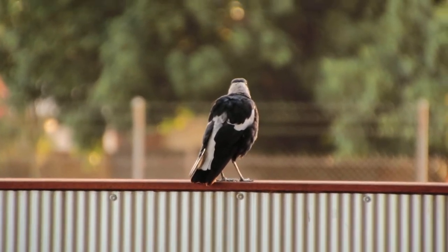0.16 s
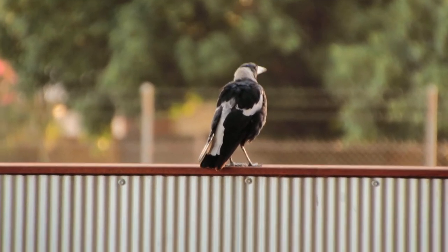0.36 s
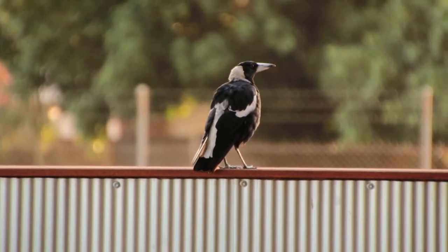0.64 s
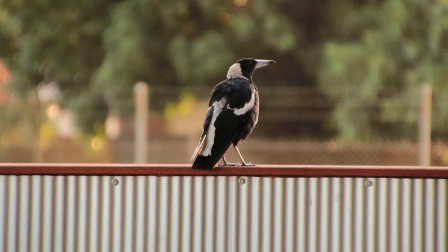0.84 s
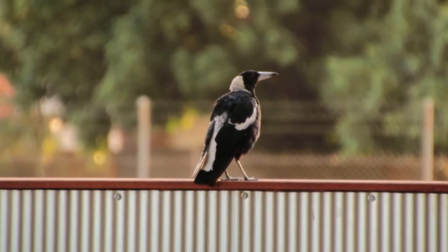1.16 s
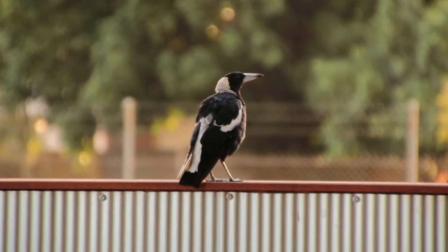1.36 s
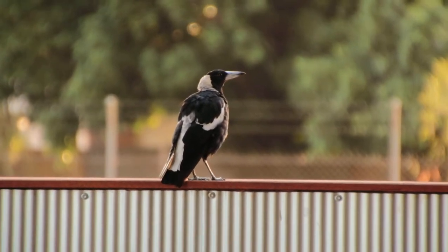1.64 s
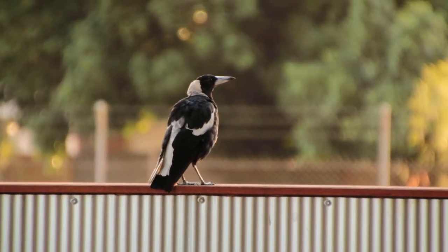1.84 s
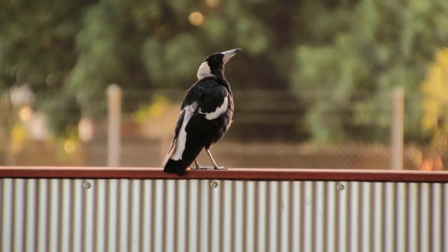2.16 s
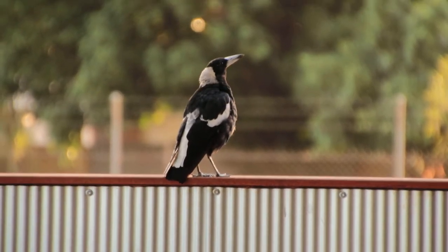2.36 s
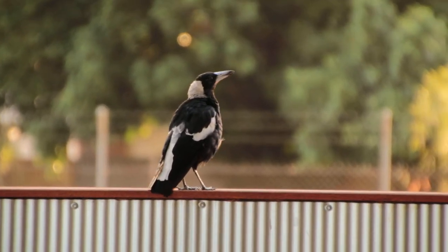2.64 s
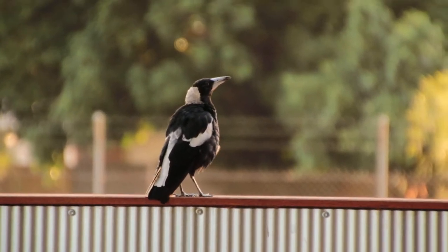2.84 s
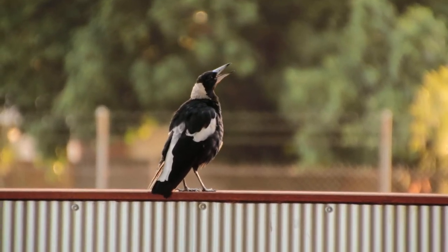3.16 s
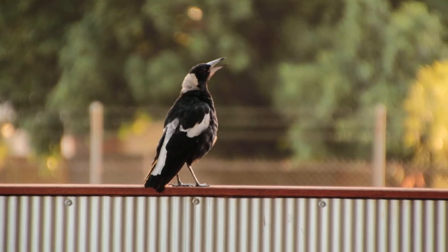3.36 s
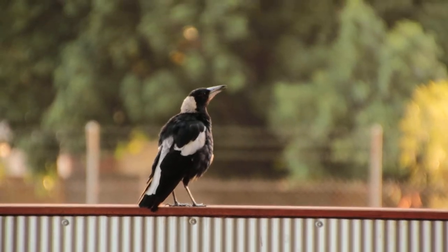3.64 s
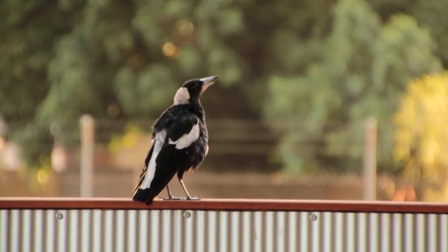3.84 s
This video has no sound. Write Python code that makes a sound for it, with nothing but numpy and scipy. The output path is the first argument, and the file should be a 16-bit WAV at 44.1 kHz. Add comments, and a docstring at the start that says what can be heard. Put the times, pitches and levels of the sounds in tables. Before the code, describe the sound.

Distant traffic hum and thin twittering of small birds come first; then a nearby magpie gives low broken warbles, a clear flute note, and a loud gliding carol, picked up in stereo in an open yard.

```python
"""Low traffic rumble and a far twittering flock are heard first, with small birds chirping in the distance.
A magpie on a garden fence then warbles softly and breaks into a loud carol.
The two sides of its syrinx sing near-pure tones, amplitude-modulated into flutter, beating and raspy.
Rasp is noise pulsed by the voice; decaying noise tails supply the reflections of fence and yard.
Traffic is filtered noise with wavering engine drones."""
import sys
import numpy as np
from scipy import signal
from scipy.fft import rfft, irfft
from scipy.io import wavfile
from scipy.ndimage import uniform_filter1d

SR = 44100
rng = np.random.default_rng(int(sys.argv[2]) if len(sys.argv) > 2 else 0)


def digitize_waveform(pressure):
    """Quantize a signal to 16-bit integers and store it at the path in sys.argv[1].

    Rows of a 2-D input are taken as channels; values are limited to [-1, 1].
    """
    field = np.atleast_2d(pressure).T
    bounded = np.clip(field, -1, 1)
    quanta = np.round(bounded * 32767).astype(np.int16)
    wavfile.write(sys.argv[1], SR, quanta)


N = 176400
T = np.arange(N) / SR

# Levels in the tables are relative: the gains and trims named below act on them too.
# soft warbled notes:
# [t/s, length/s, start f/Hz, end f/Hz, level/dB, flutter f/Hz, flutter depth/1, roughness/1]
WARBLES = [(2.17, 0.029, 655, 700, -42, 119, 0.03, .3), (2.192, 0.12, 1335, 1278, -40.5, 196, 0.34, 0.34),
           (2.213, 0.037, 1430, 1610, -39.5, 110, 0.2, .7),
           (2.235, 0.074, 1062, 1168, -38.5, 88.6, 0.47, 0.36), (2.268, 0.062, 957, 975, -34, 89, .2, 0.26),
           (2.31, 0.054, 1020, 986, -29, 171, .5, 0.15), (2.482, 0.076, 639.3, 635, -29.5, 132, 0, 0),
           (2.484, 0.071, 779, 765, -30.5, 195, 0, 0.27),
           (2.56, 0.075, 743.5, 784, -37.5, 125.3, 0.8, 0.65),
           (2.588, .035, 610, 640, -41.5, 140, 0.2, 0.03), (2.632, 0.072, 930, 970, -34, 52, 0.4, 0.52),
           (2.768, 0.049, 667, 760, -39, 100, .5, 0.35),
           (2.788, 0.089, 1357, 1397, -33.5, 302.6, 0.4, 0.37),
           (2.795, 0.11, 985, 1108, -37.5, 95, 0.65, 0.65), (2.815, 0.039, 1580, 1620, -36.5, 110, 0.6, .7),
           (2.874, 0.039, 786, 770, -33, 100, 0.04, 0), (2.93, 0.097, 776, 800, -41.5, 99, 0, 0.03),
           (3.018, 0.034, 973, 970, -29.5, 66, .6, .05), (3.047, 0.081, 975, 994, -23, 62, 0.72, 0.02),
           (3.04, 0.12, 923.5, 909, -28, 65.4, 0.42, 0.2), (3.11, 0.044, 667, 599, -37, 127, 0.15, 0),
           (3.115, 0.063, 808, 748, -33, 131.4, 0.5, 0.37), (3.145, 0.066, 988, 976, -29, 68, 0.3, 0.2),
           (3.21, 0.043, 908, 710, -35.5, 216.4, 1.1, 0.7)]
# loud short tones: cries, an overtone of the glide, and the long note's rough end:
# [t/s, length/s, start f/Hz, end f/Hz, level/dB, flutter f/Hz, flutter depth/1, roughness/1]
LOUD_TONES = [(3.208, 0.068, 1547, 1532, -31.5, 191, 0.9, 0.73),
              (3.265, 0.1, 1880, 2026, -34, 324, 1, 0.54), (3.27, 0.13, 3050, 3052, -33, 468, 0.58, .2),
              (3.333, 0.062, 2047, 2019, -22, 230, .2, 0.27),
              (3.455, 0.057, 1790, 1757, -30, 168, 0.37, 0.36),
              (3.525, 0.099, 1543, 1584, -26, 181, .4, 0.53), (3.835, 0.075, 838, 826, -29, 117, .3, 0.12),
              (3.865, 0.048, 1645, 1542, -32.5, 111, 0.34, 0.91),
              (3.9, 0.046, 1533, 1445, -24, 108.6, 0.44, 0.31),
              (3.908, 0.09, 1000, 951, -20, 109.5, 0.68, 0.11),
              (3.942, 0.048, 1278, 1355, -20, 104, 0.27, 0.67),
              (3.975, 0.029, 1290, 1230, -20, 71.8, .4, 0.36)]
# a note sung mostly on its octave: [t/s, f/Hz, level/dB]
SQUEAL = [(3.176, 980, -45), (3.192, 969, -27), (3.22, 936, -27), (3.243, 957, -23.5), (3.268, 977, -27)]
# pure fluted notes, a short and a long one: [t/s, f/Hz, level/dB]
SHORT_FLUTE = [(2.338, 975, -25.5), (2.36, 988, -14.5), (2.418, 956.4, -24.5), (2.46, 971, -30)]
LONG_FLUTE = [(3.535, 964, -40), (3.545, 978, -27), (3.585, 983, -16), (3.673, 911.7, -15.5),
              (3.705, 919.2, -23.5), (3.719, 901.3, -12.5), (3.799, 896.6, -22), (3.817, 884.6, -12.5),
              (3.901, 888.0, -25.5), (3.93, 883, -11)]
# flutter of the long note: [t/s, mean f/Hz, depth/1]
THROB = [(3.54, 144, 0), (3.62, 156, 0.13), (3.72, 173, 0.27), (3.8, 170.2, 0), (3.87, 140.3, 0.41),
         (3.93, 137.5, 0.55)]
# the two sides of the syrinx gliding down together: [t/s, f/Hz, level/dB]
LOW_SIDE = [(3.27, 1546, -44), (3.325, 1513, -29), (3.385, 1465, -29.5), (3.412, 1430, -18.5),
            (3.455, 1365, -33), (3.475, 1407, -16.5), (3.505, 1364, -23), (3.525, 1370, -20)]
HIGH_SIDE = [(3.35, 1737, -32), (3.379, 1685, -17), (3.413, 1671, -21), (3.429, 1600, -15),
             (3.466, 1589, -22.5), (3.497, 1508, -19), (3.53, 1539, -24.5)]
# overtones from the second harmonic up, relative to the fundamental: [level/dB]
SOFT_OVERTONES = [-23.5, -34]
LOUD_OVERTONES = [-26.5, -26, -49]
SQUEAL_OVERTONES = [15.5, -2.5, -2, -8, -2, -26, -32]
FLUTE_OVERTONES = [-34.5, -34, -42.5, -37, -39.5, -50.5, -39.5]
# frayed overtones of the glide, from the second harmonic up: [level/dB]
FRAYED_OVERTONES = [-21.5, -15.5, -21.5, -26.5, -36]
# rasp of the loud phrase over time: [t/s, level/dB]
RASP_LEVEL = [(3.18, -63), (3.21, -51), (3.3, -48), (3.345, -34), (3.38, -32), (3.48, -40.5), (3.54, -38.5),
              (3.6, -53.5), (3.85, -50), (3.91, -35), (4, -44)]
# spectrum of the rasp: [f/Hz, level/dB]
RASP_COLOUR = [(1100, -22), (1600, -16.5), (2500, -14), (3300, 16.5), (4000, 6.5), (4600, -9), (5900, 11),
               (6700, -2), (7800, -8.5), (9500, -9.5), (11500, -25), (15000, -43)]
# throat and bill resonances: [f/Hz, width of each filter pass/Hz, level/dB]
BILL_RESONANCES = [(2750, 240, -6), (4800, 700, -7), (5540, 300, -4), (8900, 1800, -10),
                   (10600, 650, -14.5), (12560, 1200, -12), (14700, 700, -20.5)]
# air hissing through the bill under the long note: [t/s, level/dB]
HISS_LEVEL = [(3.54, -63), (3.61, -45), (3.8, -43.5), (3.87, -45), (4, -52)]
# small birds far off: [t/s, length/s, start f/Hz, end f/Hz, level/dB]
CHIRPS = [(0.242, 0.028, 5950, 5520, -56), (0.264, 0.031, 4650, 4400, -54), (0.279, 0.023, 5500, 4140, -52),
          (.2, .09, 2550, 2355, -54), (0.768, 0.055, 5840, 5300, -56), (.81, 0.025, 4600, 4480, -53),
          (0.824, .02, 5230, 4170, -52), (.73, 0.12, 2320, 2500, -54.5), (1.02, 0.054, 4270, 4380, -58),
          (1.271, 0.038, 5830, 5270, -55.5), (1.303, .025, 4300, 4410, -52.5),
          (1.317, .02, 5500, 4360, -55), (1.402, .03, 6150, 6000, -67), (1.431, 0.027, 5830, 5700, -56.5),
          (1.436, .015, 5630, 4500, -58), (1.498, 0.13, 3920, 3955, -53), (1.565, .04, 3450, 3630, -53),
          (1.58, 0.031, 2950, 2780, -53), (1.726, 0.022, 5900, 6260, -56), (1.746, 0.11, 3560, 3370, -49),
          (1.783, .11, 3220, 2450, -53), (1.811, .04, 5750, 5260, -56), (1.863, 0.026, 5220, 4200, -53.5),
          (1.993, 0.075, 4000, 3390, -54.5), (2.21, 0.086, 3564, 3750, -49),
          (2.251, 0.1, 2660, 2830, -51.5), (2.34, 0.41, 3930, 3830, -58.5),
          (2.454, 0.082, 3850, 3370, -52.5), (2.706, 0.028, 5900, 5480, -58),
          (2.745, 0.022, 4280, 4560, -53.5), (2.885, .05, 4700, 4300, -64)]
# twitter of a far flock over time: [t/s, level/dB]
FLOCK_LEVEL = [(0, -53), (.45, -68), (.8, -50), (.95, -54), (1.15, -47), (1.35, -56), (1.85, -53),
               (2.1, -58), (2.4, -51.5), (2.75, -48.5), (3.1, -60)]
# spectrum of the flock: [f/Hz, level/dB]
FLOCK_COLOUR = [(1500, -33), (2300, -1), (2800, -4.5), (3500, -1.5), (4200, -9), (5500, -22), (9000, -43)]
# spectrum of distant traffic and air: [f/Hz, level/dB]
AIR_COLOUR = [(20, -32), (30, -25), (45, -10), (66, -11), (107, -8.5), (160, -8), (185, -8.5), (349, -12.5),
              (469, -17.5), (782, -16.5), (1080, -20), (1300, -18), (1750, -23), (2490, -21.5), (3530, -27),
              (7100, -38), (15500, -49.5)]
# engine drones: [f/Hz, level/dB, wander rate/Hz]
DRONES = [(38.7, -46.5, 0.68), (117.8, -46.5, 7.6), (161.4, -42.5, 2.24)]
# left-right correlation of the air, negative values read as none: [f/Hz, correlation/1]
LIKENESS = [(60, 0.99), (150, 0.81), (380, 0.92), (950, 0.44), (2380, -0.14), (5980, -0.03), (15000, 0.15)]
# left-minus-right balance of the traffic: [f/Hz, level/dB]
LEAN = [(60, 5.5), (110, 1.5), (200, 1.0), (380, 1.5), (700, -0.5), (1290, 0.5), (2380, -5.5), (4400, 1),
        (8120, -0.5), (15000, 2.5)]
# traffic gain, lower under the loud phrase: [t/s, level/dB]
TRAFFIC_LEVEL = [(0, -0.5), (3.33, 0), (3.45, -9), (3.8, -5), (4, -2.5)]

ATTACK_S, RELEASE_S, EDGE_S = 0.012, 0.012, 0.008
# at full roughness: rms pitch deviation (fraction), wander rate (Hz), rms strength deviation (fraction)
JITTER, JITTER_HZ, SHIMMER = 0.056, 186, 1
SQUEAL_ROUGH, FLUTE_ROUGH, GLIDE_ROUGH, CHIRP_ROUGH = 0.31, 0.05, 0.06, 0.15
WARBLE_DB, LOUD_DB, FLUTE_DB, GLIDE_DB = 0.5, 2, 0.5, 1
FRAY_HZ = 220  # wander rate that broadens the frayed overtones
# the bill points sideways, so rasp and hiss arrive mostly reflected
RASP_DB, RASP_WET_DB, RASP_LOW_HZ = -3.5, 4.5, 1200
LEFT_LAG_S, BIRD_PAN_DB = 0.00008, -1.5  # the bird sits a little to the right
NEAR_DB, NEAR_T60_S = -13.5, 0.062
YARD_DB, YARD_T60_S, YARD_RISE_S, ECHO_CUT_HZ = -4.5, 0.78, 0.017, 22000
CHIRP_DB, CHIRP_WET_DB = 0.5, -2
AIR_DB = -40.0  # before the traffic gain
CUTOFF_HZ = 15700


def magpie():
    """Superposition of tones, with noise amplitude-modulated by them; returns voice and rasp."""
    warbles = from_db(WARBLE_DB) * short_notes(WARBLES, SOFT_OVERTONES)
    loud_tones = from_db(LOUD_DB) * short_notes(LOUD_TONES, LOUD_OVERTONES)
    squeal = held_note(SQUEAL, SQUEAL_ROUGH, SQUEAL_OVERTONES)
    short_flute = held_note(SHORT_FLUTE, FLUTE_ROUGH, FLUTE_OVERTONES)
    long_flute = throb() * held_note(LONG_FLUTE, FLUTE_ROUGH, FLUTE_OVERTONES)
    flutes = from_db(FLUTE_DB) * (short_flute + long_flute)
    # the two sides sound at once and beat at their difference frequency
    glide = from_db(GLIDE_DB) * sum(held_note(side, GLIDE_ROUGH, []) for side in (LOW_SIDE, HIGH_SIDE))
    voice = warbles + loud_tones + squeal + flutes + glide

    opening = np.maximum(voice, 0)
    # dividing by the local rms leaves pulses of nearly even strength
    local_power = np.abs(uniform_filter1d(opening ** 2, size=900))
    pulsing = opening / np.sqrt(local_power + 1e-9)
    rasp = level(RASP_LEVEL) * pulsing * noise(RASP_COLOUR)
    rasp = rasp + bill_hiss() + frayed(LOW_SIDE) + frayed(HIGH_SIDE)
    return voice, from_db(RASP_DB) * rasp


def syrinx(hz, rough, overtones):
    """Harmonic series of one vibrating membrane, with random frequency and amplitude modulation."""
    unsteady_hz = hz * (1 + rough * JITTER * drift(JITTER_HZ, len(hz)))
    phase = 2 * np.pi * np.cumsum(unsteady_hz) / SR
    harmonics = [0] + list(overtones)
    wave = sum(from_db(db) * np.sin((k + 1) * phase) for k, db in enumerate(harmonics))
    return rms_one(wave * (1 + rough * SHIMMER * drift(JITTER_HZ, len(hz))))


def short_notes(rows, overtones):
    """Amplitude modulation: short linear glides whose strength flutters."""
    out = np.zeros(N)
    for start, length, start_hz, end_hz, db, flutter_hz, depth, rough in rows:
        t = np.arange(int(length * SR)) / SR
        flutter = 1 - depth * np.cos(2 * np.pi * flutter_hz * t)
        pitch = np.linspace(start_hz, end_hz, len(t))
        tone = rms_one(flutter * syrinx(pitch, rough, overtones))
        add(out, start, from_db(db) * gate(t, ATTACK_S, RELEASE_S) * tone)
    return out


def held_note(rows, rough, overtones):
    """Frequency modulation: a longer membrane tone following its pitch and level contours."""
    s, hz, db = np.transpose(rows)
    t = np.arange(int((s[-1] - s[0]) * SR)) / SR
    tone = syrinx(np.interp(t + s[0], s, hz), rough, overtones)
    loudness = from_db(np.interp(t + s[0], s, db))
    out = np.zeros(N)
    add(out, s[0], tone * loudness * gate(t, EDGE_S, EDGE_S))
    return out


def throb():
    """Amplitude modulation: fast membrane flutter puts side tones above and below a note."""
    s, hz, depth = np.transpose(THROB)
    rate = np.interp(T, s, hz) * (1 + 0.16 * drift(24.6))
    phase = 2 * np.pi * np.cumsum(rate) / SR
    return 1 + np.interp(T, s, depth) * np.cos(phase)


def frayed(rows):
    """Random modulation: overtones of a strained note smear into bands that glide with it."""
    s, hz, db = np.transpose(rows)
    phase = 2 * np.pi * np.cumsum(np.interp(T, s, hz)) / SR
    bands = 0
    for harmonic, overtone_db in enumerate(FRAYED_OVERTONES, start=2):
        band = np.real(wavering(FRAY_HZ) * np.exp(1j * harmonic * phase))
        bands = bands + from_db(overtone_db) * band
    return bands * from_db(np.interp(T, s, db, left=-140, right=-140))


def bill_hiss():
    """Resonance: turbulent air noise excites the throat and bill."""
    out = 0
    for hz, width, db in BILL_RESONANCES:
        r = np.exp(-np.pi * width / SR)
        b, a = [1, 0.0058, 0.059], [1, -2 * r * np.cos(2 * np.pi * hz / SR), r * r]
        once = signal.lfilter(b, a, rng.standard_normal(N))
        out = out + from_db(db) * rms_one(signal.lfilter(b, a, once))
    return level(HISS_LEVEL) * rms_one(out)


def echoes(x, t60, rise):
    """Diffuse reverberation: convolution with independent decaying noise tails at each ear."""
    t = np.arange(SR) / SR
    build_up = np.clip(t / rise, 0, 1) ** 2
    tail = rng.standard_normal((2, SR)) * from_db(-60 * t / t60) * build_up
    tail /= np.sqrt(np.sum(tail ** 2, axis=1, keepdims=True))
    pole = np.exp(-2 * np.pi * ECHO_CUT_HZ / SR)
    dulled = signal.lfilter([1 - pole], [1, -pole], x)
    return signal.fftconvolve(dulled[None], tail, axes=1)[:, :N]


def small_birds():
    """Exponential frequency glides: thin distant chirps, blurred by reflection from the trees."""
    out = np.zeros(N)
    for start, length, start_hz, end_hz, db in CHIRPS:
        t = np.arange(int(length * SR)) / SR
        tone = syrinx(np.geomspace(start_hz, end_hz, len(t)), CHIRP_ROUGH, [])
        add(out, start, from_db(db) * gate(t, length / 3, length / 3) * tone)
    return from_db(CHIRP_DB) * (out + from_db(CHIRP_WET_DB) * echoes(out, 0.25, 0.012))


def flock():
    """Incoherent superposition: many far birds merge into a flickering noise band at each ear."""
    ears = [noise(FLOCK_COLOUR) * from_db(2.1 * drift(20)) for _ in range(2)]
    return level(FLOCK_LEVEL) * np.array(ears)


def traffic():
    """Partial coherence: broad noise only partly alike at the ears, with wavering engine drones."""
    hz = np.arange(N // 2 + 1) * SR / N
    alike = np.clip(at_hz(LIKENESS, hz), 0, 0.995)
    sides = np.array([[1], [-1]])
    # a shared part, and a part of opposite sign at the two ears
    shared = np.sqrt(1 + alike) * rfft(noise(AIR_COLOUR))
    opposed = sides * np.sqrt(1 - alike) * rfft(noise(AIR_COLOUR))
    air = from_db(AIR_DB) * rms_one(irfft(shared + opposed, N))
    drones = 0
    for f, db, width in DRONES:
        drone = rms_one(np.real(wavering(width) * np.exp(2j * np.pi * f * T)))
        drones = drones + from_db(db) * drone
    balance = from_db(sides * at_hz(LEAN, hz) / 2)
    return level(TRAFFIC_LEVEL) * irfft(rfft(air + drones) * balance, N)


def wavering(width):
    """Random modulation: random changes of strength and phase broaden a spectral line."""
    return (drift(width) + 1j * drift(width)) / np.sqrt(2)


def drift(rate, size=N):
    """Low-pass filtering: white noise becomes a smooth random wander of unit spread."""
    # computed at one twentieth of the sample rate, past the filter's start-up
    r = np.exp(-2 * np.pi * rate * 20 / SR)
    white = rng.standard_normal(size // 20 + 4002)
    slow = signal.lfilter([1], [1, -2 * r, r * r], white)[2000:]
    return np.interp(np.arange(size) / 20, np.arange(len(slow)), rms_one(slow))


def noise(colour):
    """Spectral shaping: white noise weighted by frequency, at unit rms."""
    hz = np.arange(N // 2 + 1) * SR / N
    spectrum = rfft(rng.standard_normal(N)) * from_db(at_hz(colour, hz))
    return rms_one(irfft(spectrum, N))


def gate(t, attack, release):
    """Amplitude envelope: a sine-squared rise, hold and fall."""
    ramp = np.minimum(t / attack, (t[-1] - t) / release)
    return np.sin(np.pi / 2 * np.clip(ramp, 0, 1)) ** 2


def add(out, s, x):
    """Superposition: mix a sound in, starting at s seconds."""
    i = int(s * SR)
    out[i:i + len(x)] += x[:max(N - i, 0)]


def level(rows):
    """Level contour: gain over time from (t/s, level/dB) rows, near silence before the first."""
    return from_db(np.interp(T, *np.transpose(rows), left=-140))


def at_hz(points, hz):
    """Logarithmic frequency scale: interpolate a table along log frequency."""
    f, v = np.transpose(points)
    return np.interp(np.log(hz + 1), np.log(f), v)


def from_db(db):
    """Decibel law: level to amplitude gain."""
    return 10 ** (np.asarray(db) / 20)


def rms_one(x):
    """Power normalisation: scale to unit rms."""
    return x / np.sqrt(np.mean(x ** 2) + 1e-20)


def scene():
    """Superposition: direct magpie sound, fence and yard reflections, and the distance."""
    voice, rasp = magpie()
    high_pass = signal.butter(2, RASP_LOW_HZ, "high", fs=SR, output="sos")
    rasp = signal.sosfilt(high_pass, rasp)
    bird = voice + rasp
    pan = from_db(np.array([[1], [-1]]) * BIRD_PAN_DB / 2)
    direct = np.array([np.interp(T - LEFT_LAG_S, T, bird), bird]) * pan
    near_voice = from_db(NEAR_DB) * echoes(voice, NEAR_T60_S, 0.0096)
    near_rasp = from_db(RASP_WET_DB) * echoes(rasp, NEAR_T60_S, 0.0032)
    yard = from_db(YARD_DB) * echoes(voice + 2 * rasp, YARD_T60_S, YARD_RISE_S)
    return direct + near_voice + near_rasp + yard + small_birds() + flock() + traffic()


def record(dry):
    """Band limiting: a steep elliptic low-pass removes the highest treble."""
    low_pass = signal.ellip(12, 0.1, 90, CUTOFF_HZ, fs=SR, output="sos")
    return signal.sosfilt(low_pass, dry)


dry = scene()
out = record(dry)
digitize_waveform(out)
```